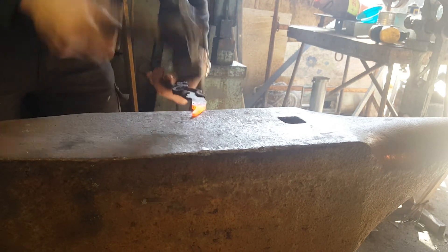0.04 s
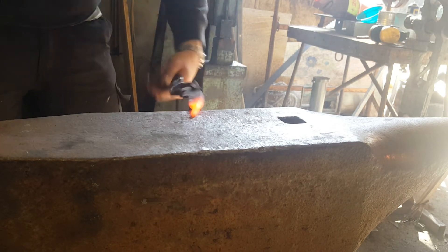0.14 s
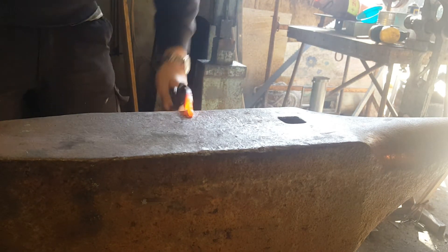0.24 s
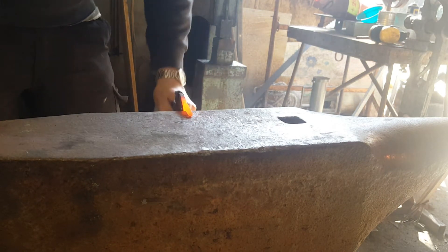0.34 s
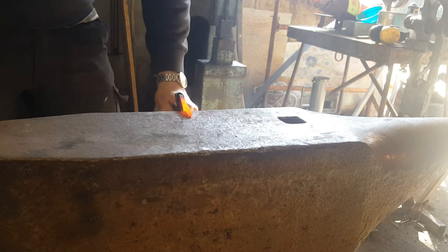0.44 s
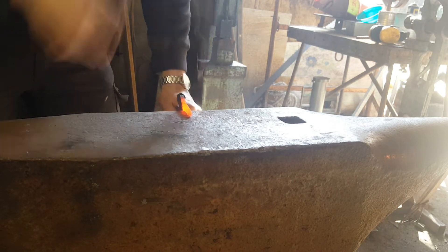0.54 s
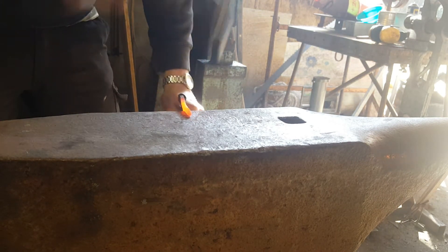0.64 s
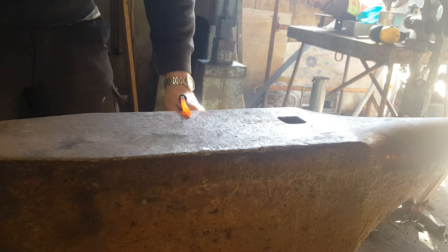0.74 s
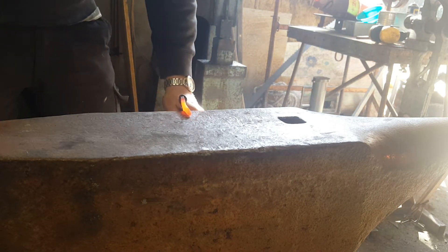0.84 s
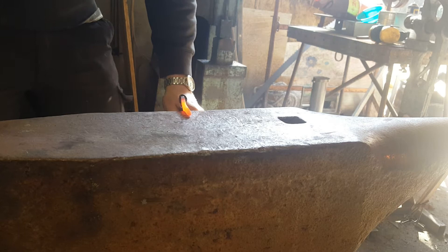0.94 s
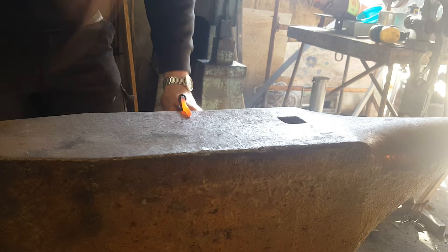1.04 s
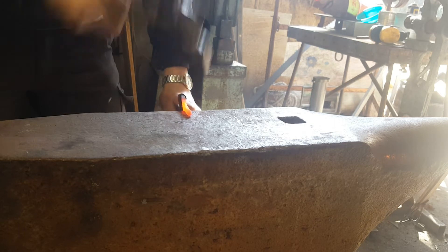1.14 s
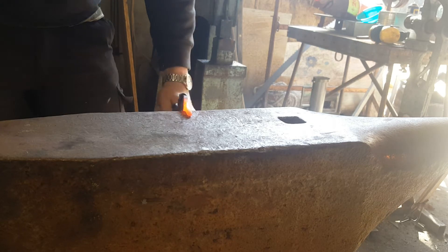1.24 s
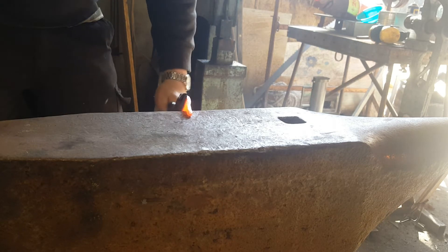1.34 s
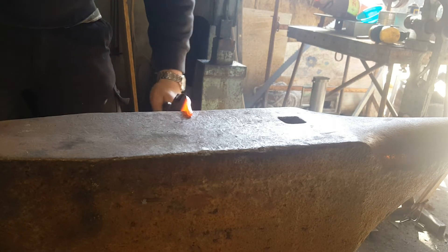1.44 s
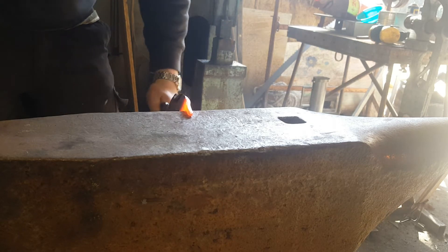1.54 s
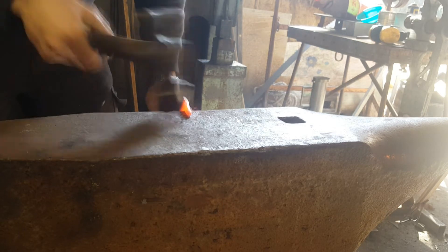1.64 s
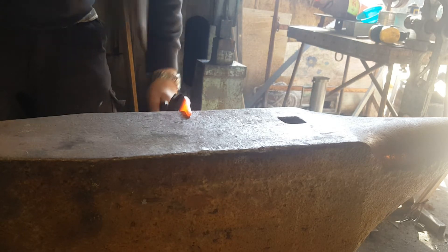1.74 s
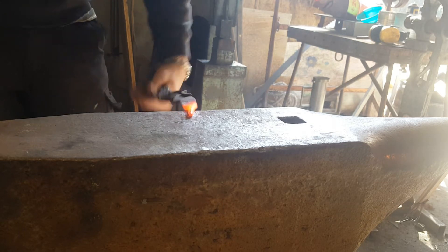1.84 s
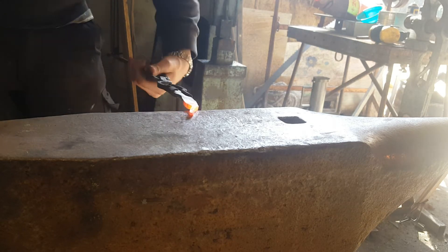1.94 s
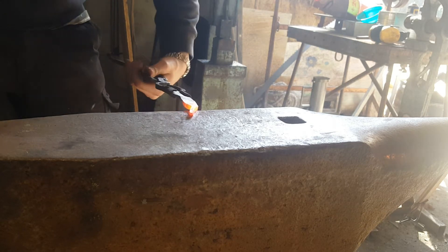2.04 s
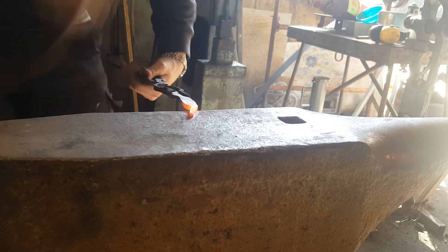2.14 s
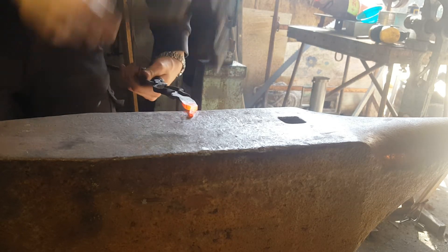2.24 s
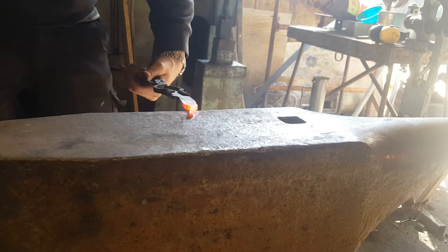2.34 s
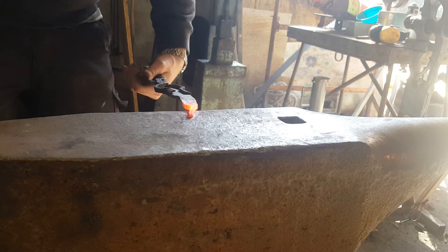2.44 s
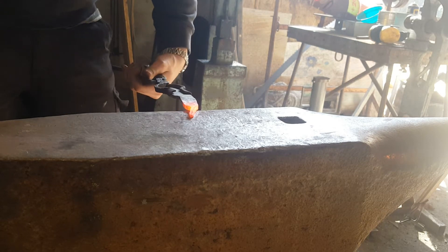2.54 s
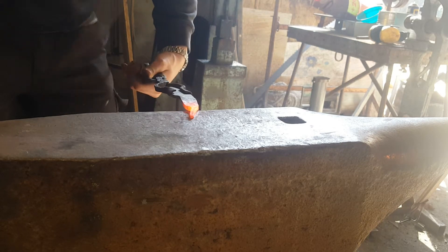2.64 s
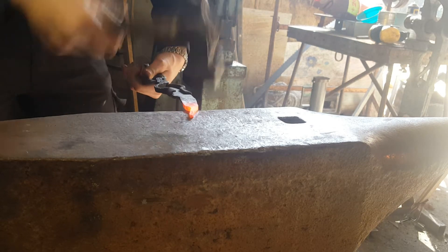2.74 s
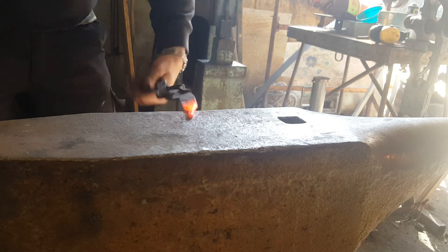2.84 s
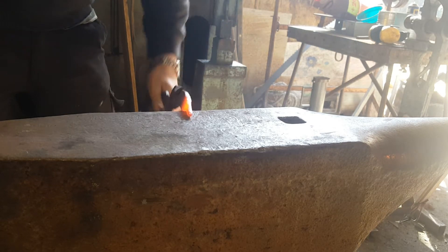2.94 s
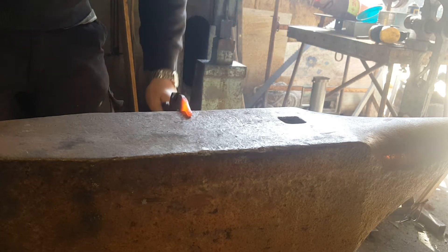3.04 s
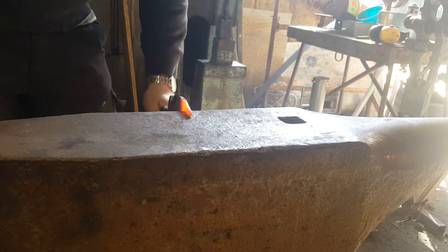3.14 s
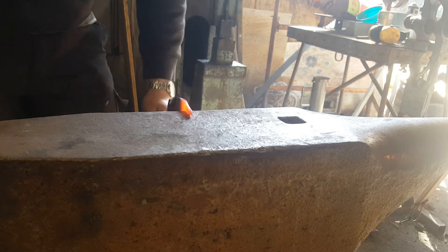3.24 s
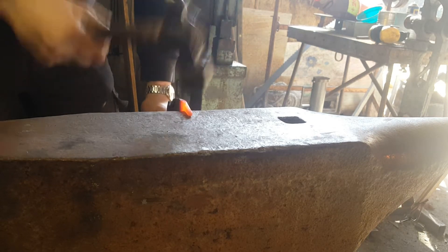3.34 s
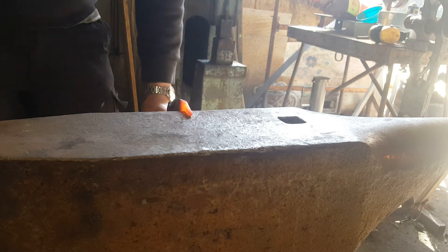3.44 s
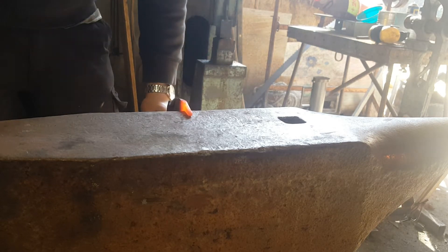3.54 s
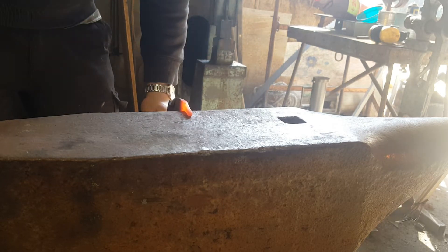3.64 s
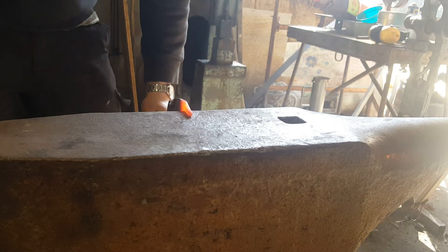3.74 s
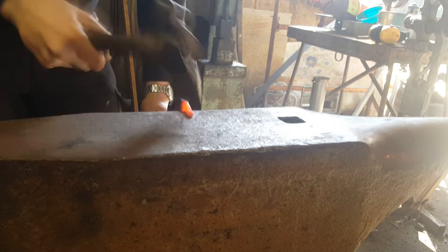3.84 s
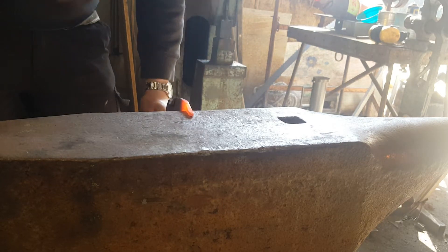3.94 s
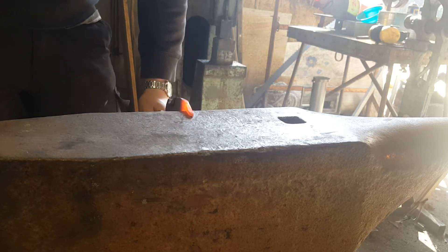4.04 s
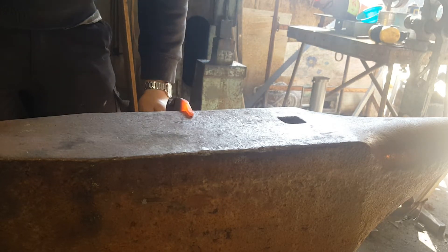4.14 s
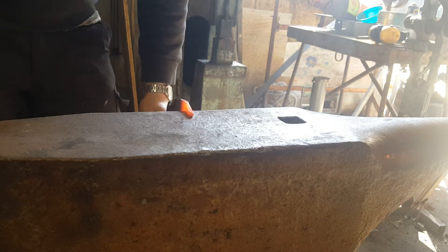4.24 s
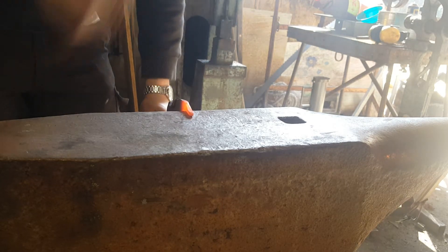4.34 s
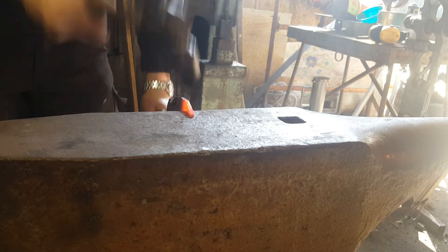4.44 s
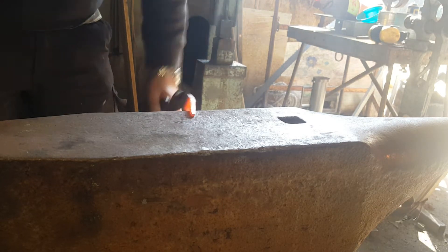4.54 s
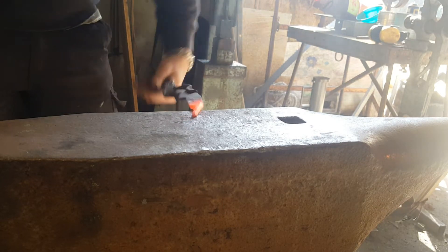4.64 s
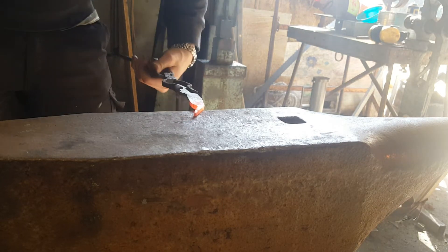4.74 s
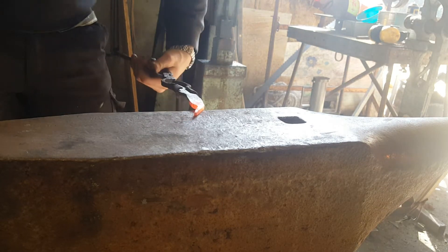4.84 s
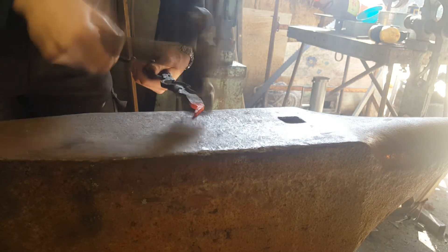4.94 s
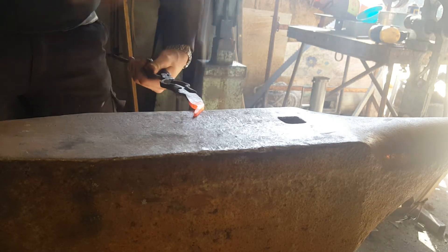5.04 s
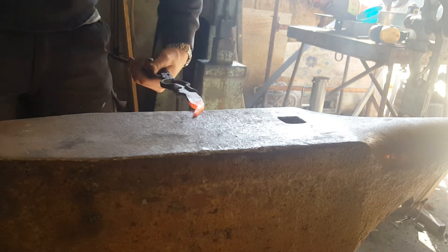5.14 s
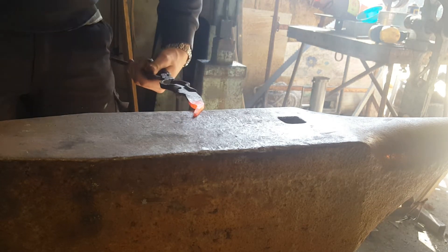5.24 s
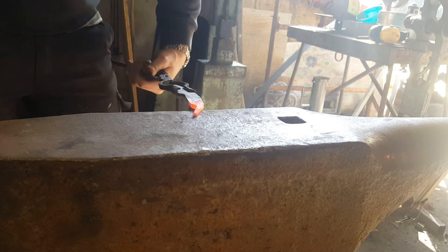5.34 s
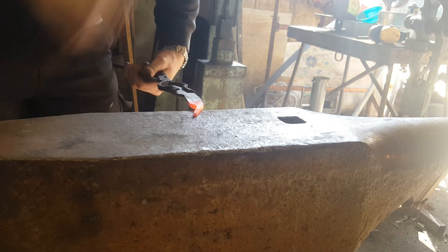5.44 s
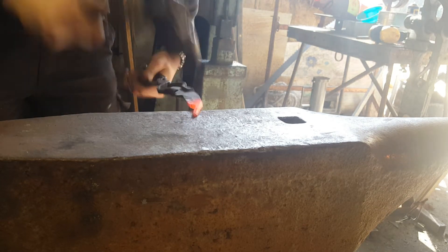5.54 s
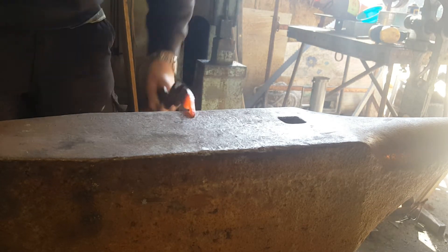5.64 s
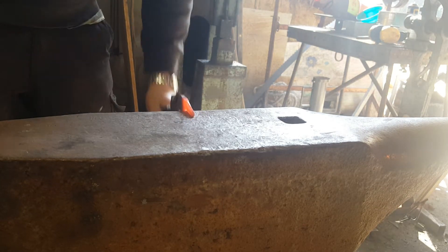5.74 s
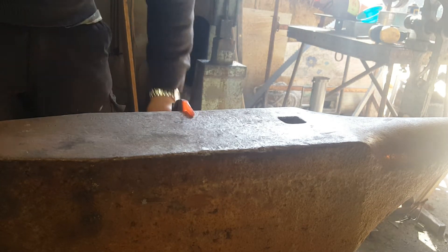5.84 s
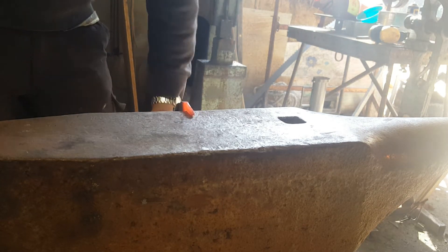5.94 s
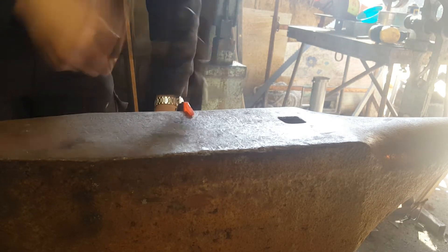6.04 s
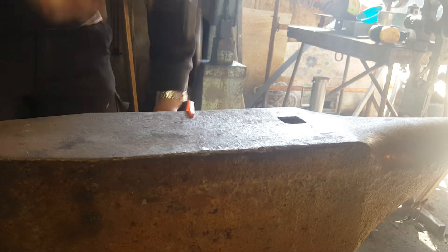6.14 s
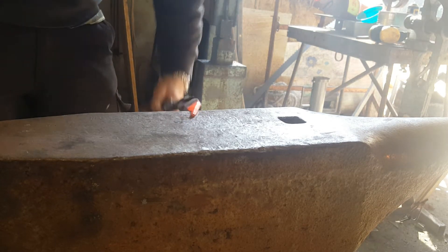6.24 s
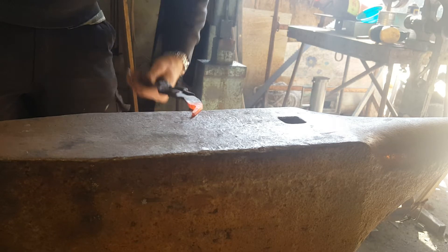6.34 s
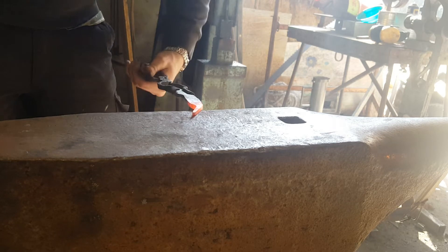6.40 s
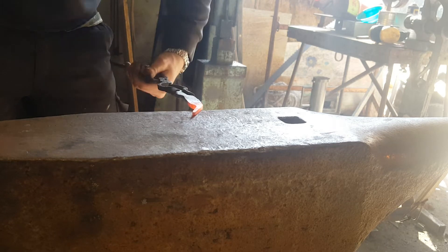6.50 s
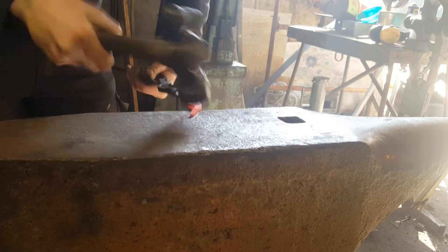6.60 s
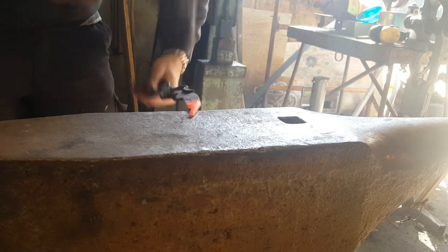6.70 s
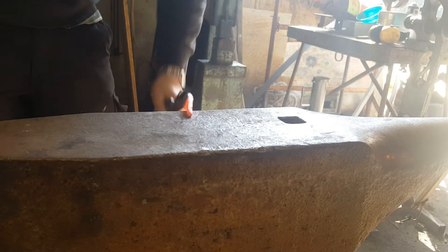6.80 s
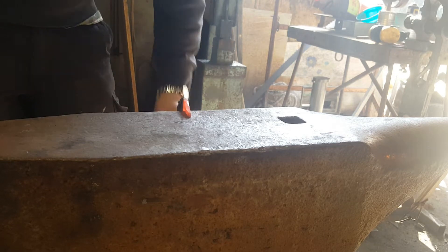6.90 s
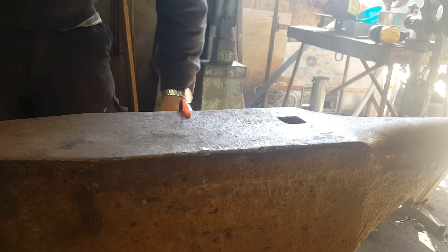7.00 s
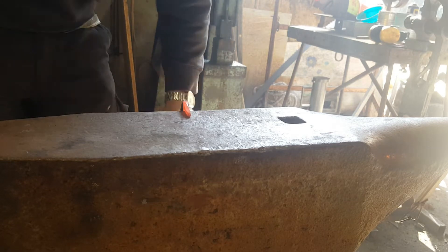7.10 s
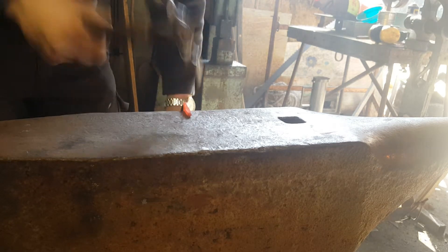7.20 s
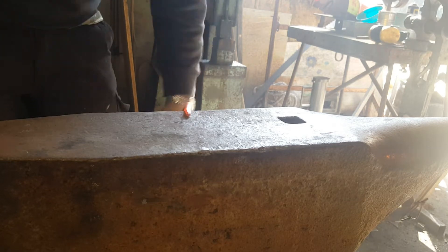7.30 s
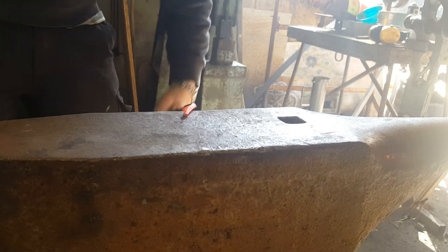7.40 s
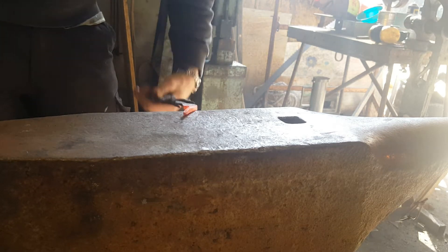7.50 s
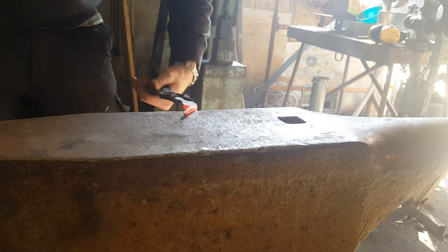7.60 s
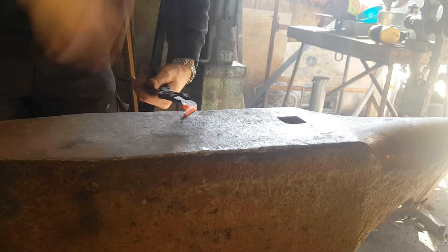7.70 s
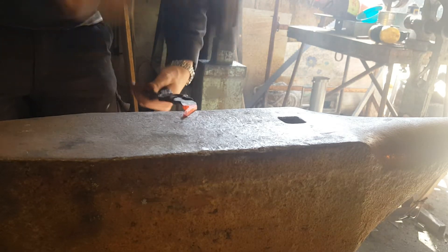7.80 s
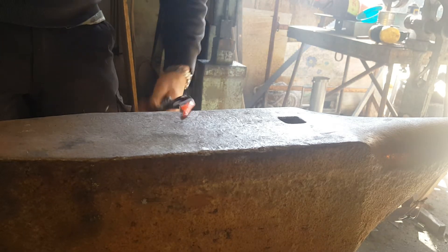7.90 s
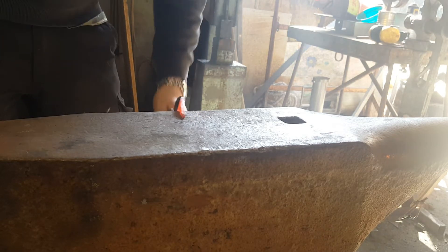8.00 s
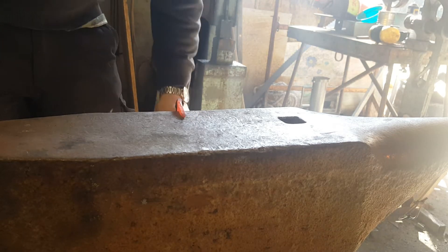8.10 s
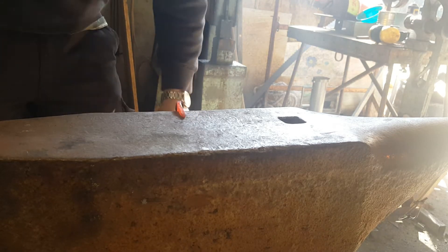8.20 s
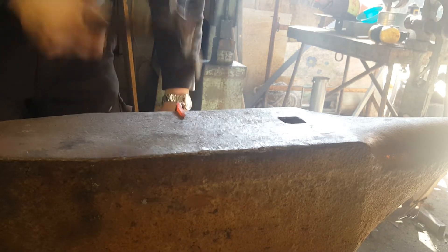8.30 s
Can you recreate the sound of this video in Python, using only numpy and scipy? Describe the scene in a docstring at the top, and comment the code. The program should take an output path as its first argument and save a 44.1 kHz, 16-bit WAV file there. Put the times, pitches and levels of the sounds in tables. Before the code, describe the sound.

Steady hammering on an anvil from start to finish, the microphone very near. Every blow cracks sharply, clinks brightly and dies within about half a second, before the next one lands. Force and ring vary slightly, the first blow being hardest. Near walls throw back quick reflections and a short diffuse tail. Faint dry ticks and a barely audible fire roar fill the gaps.

```python
"""Hammer and anvil in a smithy

A hand hammer strikes hot steel on an anvil about twice a second, heard close by in stereo.
Each blow is shaped noise for the crack, with decaying sine modes for anvil, hammer head and thud.
A small room answers with near echoes and a diffuse tail of decaying noise bands.
Short noise snaps mark flakes of scale or coal; the forge fire is a soft roar of random spectra."""
import sys
import numpy as np
from scipy import signal
from scipy.fft import rfft, irfft
from scipy.io import wavfile
from scipy.ndimage import uniform_filter1d

SR = 44100
rng = np.random.default_rng(int(sys.argv[2]) if len(sys.argv) > 2 else 0)


def waveform_to_disk(signal):
    """Save audio, clipped to [-1, 1], as 16-bit WAV at the path in sys.argv[1]."""
    frames = np.transpose(np.atleast_2d(signal))
    scaled = np.clip(frames, -1, 1) * 32767
    samples = np.round(scaled).astype(np.int16)
    wavfile.write(sys.argv[1], SR, samples)


N = 368676

# hammer blows: (time [s], force [dB], hardness as crack tilt [dB/octave], hammer ring [dB],
#  main note [dB], its neighbours [dB], horn [dB], main note pan L-R [dB], thud [dB],
#  low ping [dB], high ping [dB])
BLOWS = [(0.0451, 0.5, 2.5, -19, -13.5, -8, -39.5, 9, -31, -16, -16.5),
         (0.591, -4, -0.16, -35.5, -19.5, -7, -42.5, 3.5, -29.5, -29, -30),
         (1.12, -2, 1.1, -19.5, -9.5, -7.5, -27.5, -1.5, -30, -24, -27),
         (1.6673, -4, 0.74, -21, -13, -8, -34.5, 2, -28, -29, -20.5),
         (2.2217, -1.5, 1.96, -19, -13, -6.5, -20.5, 5, -31, -25, -19),
         (2.7447, -1.5, 2.5, -22, -12, -7, -36.5, 7.5, -32, -29.5, -21),
         (3.3389, -3.5, 1.3, -20.5, -13.5, -9, -31, 5, -35, -20.5, -22),
         (3.8679, -2, 2.5, -32.5, -14.5, -12.5, -18.5, 5.5, -34.5, -25.5, -18),
         (4.4079, -3, 1.16, -25, -15, -12.5, -25, 1.5, -29, -23.5, -22),
         (4.9781, -2, 0.75, -16.5, -10.5, -8, -29, 6, -29, -23.5, -22.5),
         (5.5114, -0.9, 2.2, -21.5, -12, -7, -23.5, 9.5, -28, -35, -17.5),
         (6.0859, -2.5, 1.76, -18, -15, -7, -23, 6, -28.5, -15.5, -24),
         (6.6301, -2, 0.83, -14, -16, -3.5, -40, 3.5, -31.5, -21, -19.5),
         (7.2095, -1, 3, -19.5, -15.5, -10.5, -13.5, 7.5, -29.5, -17.5, -32),
         (7.7595, -3.5, 1.17, -23.5, -15.5, -8.5, -22.5, 3.5, -33.5, -39, -20.5),
         (8.302, -0.8, 2.5, -19.5, -10.5, -6, -14, 6, -31.5, -14, -25)]
# ringing modes: (frequency [Hz], relative level [dB], decay by 60 dB [s], L-R level [dB], left lead [rad],
# polarity [+1 or -1], part [0 main note, 1 close lines beside it, 2 heel, 3 horn, 4 clang, 5 face])
ANVIL_MODES = [ (1709.8, 0, .35, 0, -1.7, 1, 0), (1712.9, -9, .45, -5, 2.1, -1, 1),
               (1715.6, -12, .41, -1, -1.1, -1, 1), (1719, -8, .26, 3, -.9, 1, 1),
               (1930, 0, .22, -5, 1.5, 1, 2), (1938, -3, .27, -6, .9, -1, 2), (1951, -3, .22, 5, .6, -1, 2),
               (2556, -4, .12, 1, -.8, 1, 3), (1150, 4, .1, 2, 0, 1, 4), (1505, 5, .09, 1, 2.3, 1, 4),
               (3030, 0, .13, -1, 2.9, 1, 4), (3714, -2, .12, 0, -.8, 1, 4), (4015, -6, .2, 0, -2.8, 1, 4),
               (4290, -4, .12, -4, -1.1, 1, 4), (4882, -4, .12, 0, -1.6, 1, 4),
               (5973, -4, .17, -2, -1.5, 1, 4), (6173, -8, .32, -2, -.6, 1, 4),
               (7550, -6, .15, -1, -1.1, 1, 4), (8920, -6, .14, 5, -1, 1, 4),
               (10106, -13, .2, 7, 1.3, 1, 4), (7435, 3, .43, 6, 2.2, 1, 5),
               (10998, -11, .35, 0, -1.3, 1, 5), (11372, -9, .4, 8, .6, 1, 5),
               (11717, -3, .42, 10, 1.2, 1, 5), (12088, -3, .43, 7, -2.6, 1, 5),
               (13372, -2, .32, 6, -2, 1, 5), (13464, -9, .36, 5, .1, 1, 5),
               (14155, -9, .38, 14, -.2, 1, 5), (14731, -6, .33, 6, -2, 1, 5),
               (15151, -8, .33, 1, -2, 1, 5)]
# random blow-to-blow spread of the modes, one entry per anvil part: (standard deviation [dB])
PART_SCATTER_DB = [.5, .5, 1.5, .5, 3, 4.5]
# share of the ringing sent to the room, one entry per anvil part: (level [dB])
PART_SEND_DB = [-30, -30, -7, -1, 0, -9]
# heel, clang and face: level = force + soft level [dB] + gain [dB per dB/octave] x hardness
SOFT_DB, HARD_GAIN_DB = [-20.5, -37.5, -46], [1.5, 4, 3]
# hammer head modes, damped by the handle: (nominal frequency [Hz], relative level [dB],
#  decay by 60 dB [s], L-R level [dB], left lead [rad], polarity [+1 or -1])
HEAD_MODES = [(6500, 0, .19, 3, -1.6, 1), (8340, 6, .03, 2, 0, 1), (11850, 0, .035, 7, 0, 1)]
# spectrum of the crack: (frequency [Hz], relative density [dB per Hz])
CRACK_SPECTRUM = [(60, -13), (150, 7), (300, 3), (700, -2), (1500, 1), (3000, -13), (5300, -17.5),
                  (8000, -16), (11000, -22.5), (15300, -20.5), (16500, -36)]
# modes of stump and floor: (frequency [Hz], relative level [dB], decay by 60 dB [s])
STUMP_MODES = [(77.64, -2.5, 0.32), (87, -7, 0.6), (105, 0.26, 0.37), (119, -1, 0.22), (141.2, 3, 0.15),
               (175, 0.5, 0.25), (246, 2, 0.074), (291.6, -3, 0.29), (389, -3.5, 0.21)]
# reflections from near surfaces: (delay [s], left level [dB], right level [dB])
NEAR_ECHOES = [(.0079, -0.5, -1.5), (0.0117, -8, -6.5), (.021, -9.5, -19.5)]
# colour of the room: (frequency [Hz], relative level [dB])
ROOM_COLOUR = [(60, -11), (150, -5.5), (300, 5), (700, 3.8), (1500, 3.5), (3200, 8.5), (4500, 7.5),
               (6500, 4), (10000, 1), (16000, -2)]
# reverberation: (band centre [Hz], decay by 60 dB [s])
ROOM_DECAY = [(80, .5), (250, 0.32), (800, 0.3), (2000, 0.34), (4000, 0.31), (7500, 0.3), (11000, 0.28),
              (15000, 0.24)]
# left-right likeness of a diffuse field: (frequency [Hz], correlation [-1 to 1])
LIKENESS = [(60, .75), (130, .93), (290, .9), (640, .7), (1400, -.1), (3100, .05), (15000, .05)]
# snaps of scale or coal: (time [s], level [dB], centre [Hz], tail over snap [dB], pan L-R [dB])
TICKS = [(.850, -30.5, 9000, 4.5, -9), (1.98, -45.5, 9160, 4, -2.5), (2.078, -37, 9250, -4.5, -6),
         (2.600, -44, 6980, -3, -6), (4.725, -29, 5460, 2, -10)]
# spectrum of the fire: (frequency [Hz], relative density [dB per Hz])
ROAR_SPECTRUM = [(15, -94.5), (25, -46.5), (48, -21), (135, -3.5), (238, -15.5), (321, -10.5), (378, -20),
                 (470, -2), (568, -20.5), (617, -9.5), (979, -9), (2210, -12.5), (3410, -21.5),
                 (14800, -40.5), (16500, -57.5)]
# resonances added to the roar: (frequency [Hz], width [Hz], relative level [dB])
FLUE_RESONANCES = [(430, 180, -13.5), (440, 450, -12)]
# course of the fire: (time [s], level [dB])
FIRE_LEVEL = [(0.32, -54.5), (1.73, -54.5), (1.82, -52.5), (4.03, -55.5), (4.12, -58.5), (5.02, -55),
              (5.16, -50.5), (6.66, -55.5), (6.75, -55.5), (7.37, -53), (7.5, -60.5), (7.81, -56),
              (7.92, -53.5), (8.25, -54)]

CRACK_DB, CRACK_PAN_DB, ROOM_DB = 10.5, 4, 5  # crack over force, its pan L-R, room over crack
SNAP_DB = -8  # the clean first front of the blow, over the crunch
STEEL_RISE_S, HEAD_RISE_S, THUD_RISE_S = 0.0069, 0.00054, 0.0019  # time constants of the onset
THUD_PAN_DB, THUD_LEAD_RAD = -0.7, 0.32  # L-R level and left lead in phase
BAND_EDGE_HZ = 16000
T = np.arange(SR * 6 // 10) / SR  # time axis of one ringing sound [s]


def blow(walls, force_db, tilt_db, head_db, note_db, near_db, horn_db, note_pan_db, thud_db, *pings_db):
    """Impact excitation: a broadband crack sets steel, stump and room sounding together."""
    click = pulse(lambda hz: read(CRACK_SPECTRUM, hz) + tilt_db * np.log2((hz + 1) / 2000))
    size = gain_of(force_db + CRACK_DB)
    crunch = size * burst(click, .016)

    # a hard blow stirs the lesser modes more
    heel_db, clang_db, face_db = force_db + np.array(SOFT_DB) + tilt_db * np.array(HARD_GAIN_DB)
    parts_db = [note_db, near_db, heel_db, horn_db, clang_db, face_db]
    steel, steel_to_room = anvil(note_pan_db, parts_db)
    head = hammer(head_db, *pings_db)
    low = thud(thud_db)

    out = head + steel + low
    add(out, 0, crunch * pan(CRACK_PAN_DB))
    add(out, 0, size * gain_of(SNAP_DB) * click * pan(CRACK_PAN_DB))
    add_near_echoes(out, crunch)
    ringing_to_room = steel_to_room + gain_of(-2.0) * head[:1] + gain_of(-8.0) * low[:1]
    crack_answer = size * gain_of(ROOM_DB) * in_room(click, walls)
    return out + in_room(ringing_to_room, walls) + crack_answer


def anvil(note_pan_db, parts_db):
    """Modal superposition: the anvil's parts ring at their own levels; close lines beside the main note make it
    beat."""
    hz, mode_db, t60, side_db, lead, polarity, part = np.transpose(ANVIL_MODES)[:, :, None]
    part = part.astype(int)
    scatter_db = np.array(PART_SCATTER_DB)[part] * rng.standard_normal(mode_db.shape)
    level_db = mode_db + np.array(parts_db)[part] + scatter_db
    side_db = side_db + note_pan_db * (part < 2)  # only the main note and its neighbours move
    modes = ring(hz, level_db, t60, side_db, lead, polarity, STEEL_RISE_S)
    direct = modes.sum(1)
    to_room = (modes[:1] * gain_of(PART_SEND_DB)[part]).sum(1)
    return direct, to_room


def hammer(*modes_db):
    """Damped free vibration: the head's modes shift a little in pitch as the grip changes."""
    hz, mode_db, *rest = np.transpose(HEAD_MODES)[:, :, None]
    struck_hz = hz * (1 + 0.0011 * rng.standard_normal(hz.shape))
    level_db = np.array(modes_db)[:, None] + mode_db  # the ring and two short pings
    return ring(struck_hz, level_db, *rest, HEAD_RISE_S).sum(1)


def pulse(colour_db):
    """Minimum phase: a spectrum's log gain fixes the phase of its causal click."""
    hz = abs(np.fft.fftfreq(2048, 1 / SR))
    log_gain = np.log(gain_of(np.maximum(colour_db(hz), -100)))
    phase = -signal.hilbert(log_gain).imag
    return unit(np.fft.ifft(np.exp(log_gain + 1j * phase)).real[None])


def burst(click, t60):
    """Convolution with decaying noise: the click smears into a crunch, different in each channel."""
    grains = rng.standard_normal((2, 2048)) * gain_of(-60 * T[:2048] / t60)
    return unit(signal.fftconvolve(grains, click))


def thud(db):
    """Low modal vibration: stump and floor shake in a few damped modes."""
    hz, mode_db, t60 = np.transpose(STUMP_MODES)[:, :, None]
    return ring(hz, db + mode_db, t60, THUD_PAN_DB, THUD_LEAD_RAD, 0.95, THUD_RISE_S).sum(1)


def ring(hz, db, t60, side_db, lead, polarity, rise_s):
    """Exponential decay of sine modes, one row each, with a level and phase for each channel."""
    size = polarity * gain_of(db - 60 * T / t60) * (1 - np.exp(-T / rise_s))
    turn = 2 * np.pi * hz * T
    left = size * gain_of(side_db / 2) * np.sin(turn)
    right = size * gain_of(-side_db / 2) * np.sin(turn - lead)
    return np.array([left, right])


def add_near_echoes(out, crunch):
    """Early reflection: rough walls return the crunch late, with less treble."""
    dull = signal.lfilter(*signal.butter(1, 3500, fs=SR), crunch.mean(0))
    for late, left_db, right_db in NEAR_ECHOES:
        add(out, late, dull * gain_of([[left_db], [right_db]]))


def tick(walls, db, hz, tail_db, pan_db):
    """Brief release: a bright snap of about a millisecond excites the room."""
    click = pulse(lambda f: -4.0 * np.log2((f + 1) / hz) ** 2)
    out = gain_of(db + tail_db) * in_room(click, walls)
    add(out, 0, gain_of(db) * burst(click, .003) * pan(pan_db))
    return out


def tail():
    """Diffuse reverberation: noise in overlapping bands, each decaying at its own rate."""
    hz = np.fft.rfftfreq(len(T), 1 / SR)
    noise = rfft(rng.standard_normal((2, len(T))))
    spectra = pair(noise, hz) * gain_of(read(ROOM_COLOUR, hz))
    centres = [centre for centre, _ in ROOM_DECAY]
    diffuse = 0
    for weights, (_, t60) in zip(np.eye(len(ROOM_DECAY)), ROOM_DECAY):
        window = read(list(zip(centres, weights)), hz)  # triangle around one centre
        diffuse = diffuse + irfft(spectra * window, len(T)) * gain_of(-60 * T / t60)

    # benches and tools throw the sound back in clumps, smoothing out with time
    lumps = uniform_filter1d(rng.standard_normal(len(T)), 90)
    lumpy = gain_of(3.5 * lumps / lumps.std() * np.exp(-T / .12))
    onset = 1 - np.exp(-(T / 0.0021) ** 2)
    return unit(diffuse * lumpy * onset)


def in_room(x, walls):
    """Linear response: the mean of the channels convolved with the room's impulse response."""
    return signal.fftconvolve(x.mean(0)[None], walls)[:, :len(T)]


def fire():
    """Turbulent noise: random short-time spectra with flue resonances and drifting patches."""
    frames, hz = N // 256 + 5, np.fft.rfftfreq(1024, 1 / SR)
    a, b, c, d, patches = np.moveaxis(rng.standard_normal((frames, 513, 5)), 2, 0)
    patches = uniform_filter1d(uniform_filter1d(patches, 10, 0), 12, 1)  # over time, then frequency
    drift = gain_of(1.3 * patches / patches.std())
    flue = sum(gain_of(db) / (1 + (2 * (hz - f) / width) ** 2) for f, width, db in FLUE_RESONANCES)
    colour = gain_of(read(ROAR_SPECTRUM, hz)) + flue
    spectra = pair([a + 1j * b, c + 1j * d], hz) * colour * drift
    roar = signal.istft(spectra.transpose(0, 2, 1), nperseg=1024, noverlap=768)[1][:, :N]
    s, db = np.transpose(FIRE_LEVEL)
    return roar / roar.std() * gain_of(np.interp(np.arange(N) / SR, s, db))


def pair(z, hz):
    """Spatial correlation: mixes two unrelated spectra to the likeness of a diffuse field."""
    same = np.clip(read(LIKENESS, hz), -1, 1)
    return np.array([z[0], same * z[0] + np.sqrt(1 - same ** 2) * z[1]])


def gain_of(db):
    """Logarithmic level: decibels to amplitude gain."""
    return 10 ** (np.asarray(db) / 20)


def read(points, hz):
    """Interpolation of (frequency [Hz], value) on a log-frequency axis."""
    f, value = np.transpose(points)
    return np.interp(np.log(hz + 1), np.log(f + 1), value)


def unit(x):
    """Energy normalisation: each channel scaled to energy 1 along time."""
    return x / np.sqrt((x ** 2).sum(-1, keepdims=True) + 1e-20)


def pan(db):
    """Intensity stereo: left and right gains for a level difference."""
    return gain_of([[db / 2], [-db / 2]])


def add(mix, s, sound):
    """Superposition: sums a sound into the mix from time s."""
    part = mix[:, round(s * SR):][:, :sound.shape[1]]
    part += sound[:, :part.shape[1]]


def scene():
    """Superposition of blows, snaps and fire; each blow's room tail is part shared, part fresh noise."""
    mix, room = fire(), tail()
    kept = .5  # weight of the shared tail, in energy
    for s, *row in BLOWS:
        walls = np.sqrt(kept) * room + np.sqrt(1 - kept) * tail()
        add(mix, s, blow(walls, *row))
    for s, *row in TICKS:
        add(mix, s, tick(room, *row))
    return mix


def record(dry):
    """Transduction: the microphone drops deep bass, high peaks round off, then a band limit."""
    thin = signal.sosfilt(signal.butter(3, 65, "high", fs=SR, output="sos"), dry)
    soft = .95 * np.tanh((abs(thin) / .95) ** 2) ** .5 * np.sign(thin)
    band_limit = signal.firwin(151, BAND_EDGE_HZ, window=("kaiser", 11), fs=SR)
    return signal.oaconvolve(soft, band_limit[None], "same")


dry = scene()
out = record(dry)
waveform_to_disk(out)
```